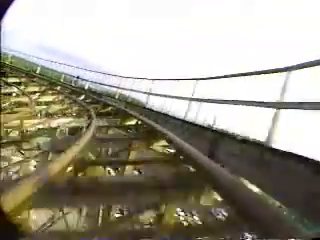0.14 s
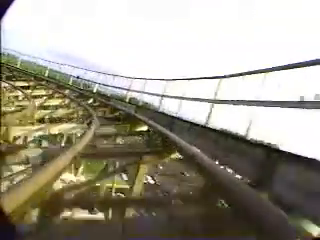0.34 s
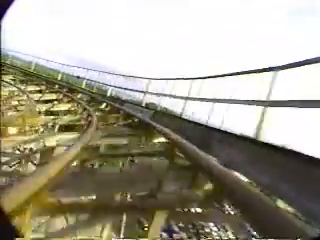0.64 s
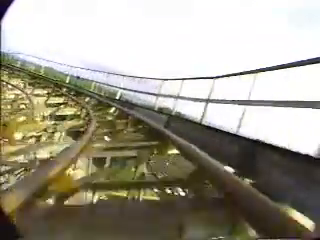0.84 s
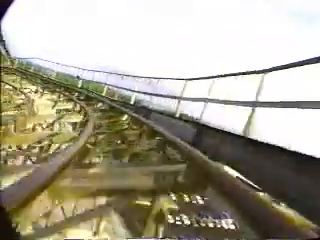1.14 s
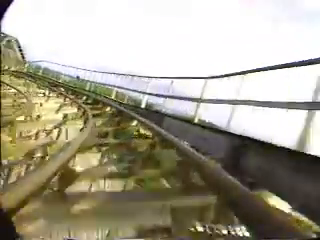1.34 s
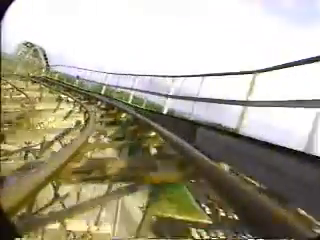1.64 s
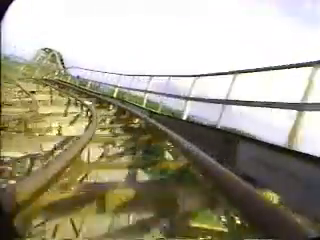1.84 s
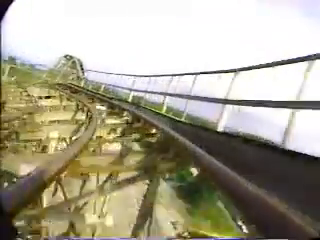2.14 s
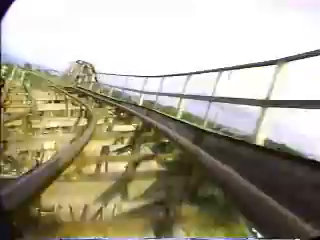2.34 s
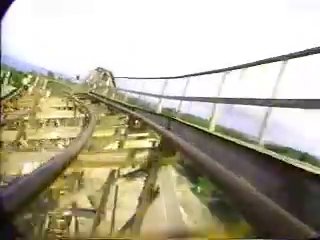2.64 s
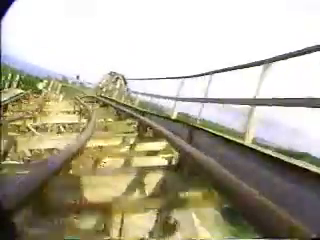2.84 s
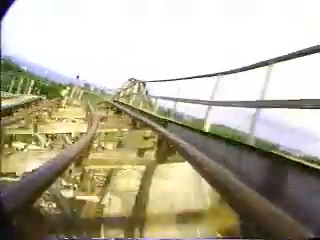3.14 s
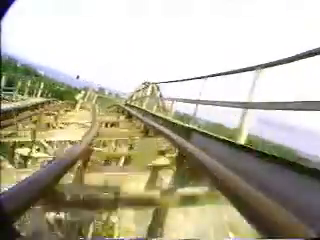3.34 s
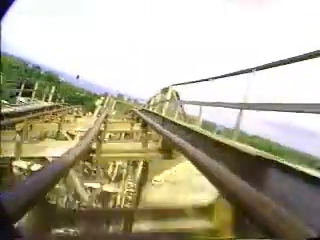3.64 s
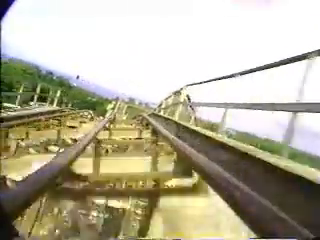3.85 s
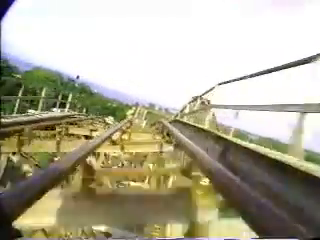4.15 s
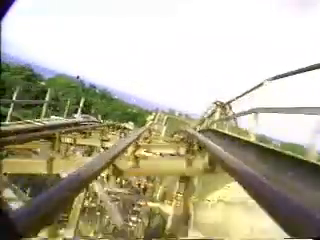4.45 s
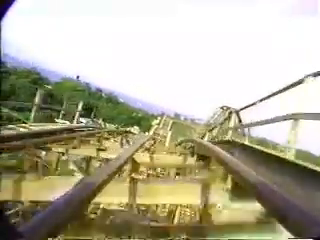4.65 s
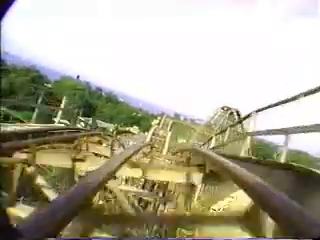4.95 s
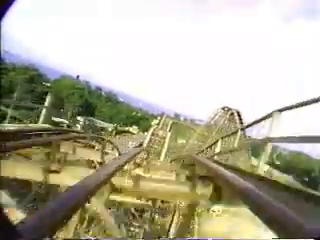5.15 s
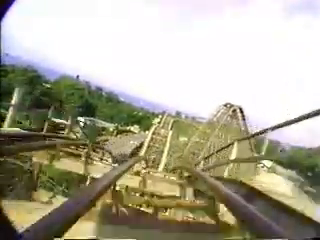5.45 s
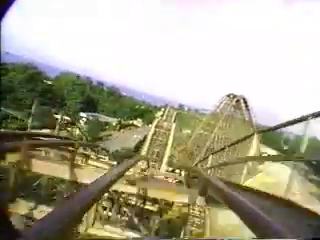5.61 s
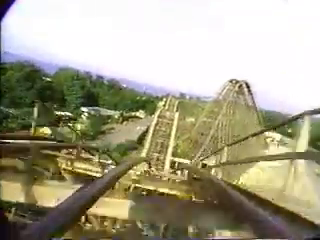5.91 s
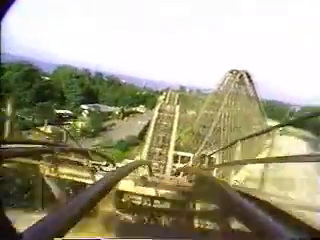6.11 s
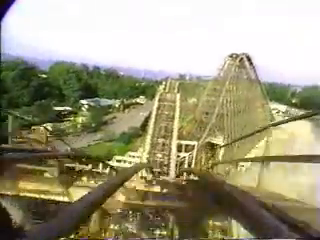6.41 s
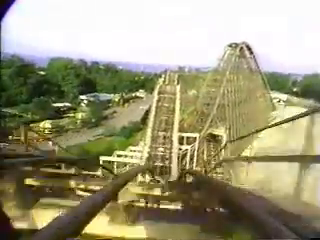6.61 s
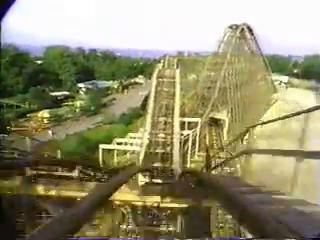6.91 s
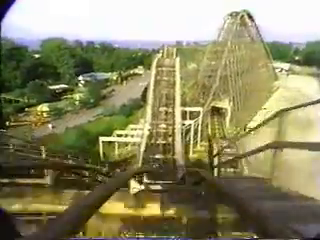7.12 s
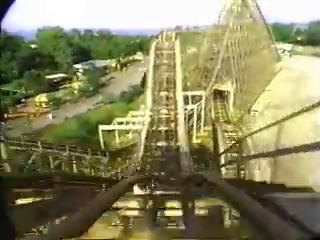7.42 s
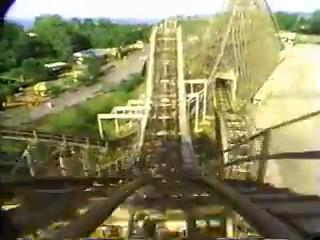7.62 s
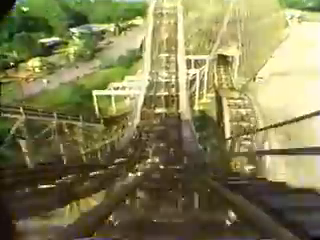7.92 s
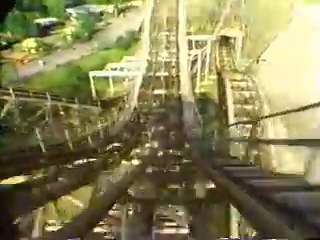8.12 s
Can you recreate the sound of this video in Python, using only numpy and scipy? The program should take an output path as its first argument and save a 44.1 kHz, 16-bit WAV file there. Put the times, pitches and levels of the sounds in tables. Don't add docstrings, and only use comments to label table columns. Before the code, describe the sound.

Heard from the front car of a roller coaster, wheels drone low through the body, swelling and dropping in quick uneven pulses. Early gusts slam the onboard microphone, distorting into bassy thumps that swallow the treble. The wind eases midway, leaving hum, rolling hiss and ringing axle chatter. Near the end the shaking grows and loose parts clank rapidly. Tape hiss stays underneath.

```python
import sys
import numpy as np
from scipy import signal
from scipy.fft import rfft, irfft, next_fast_len
from scipy.io import wavfile
from scipy.ndimage import uniform_filter1d, map_coordinates

SR = 44100
rng = np.random.default_rng(int(sys.argv[2]) if len(sys.argv) > 2 else 0)


def to_linear_factor(level_db):
    exponent = np.asarray(level_db, float) / 20
    return 10 ** exponent


def digitize_waveform(pressure):
    field = np.atleast_2d(pressure).T
    bounded = np.clip(field, -1, 1)
    quanta = np.round(bounded * 32767).astype(np.int16)
    wavfile.write(sys.argv[1], SR, quanta)


N = 364707


def unit(x):
    return x / np.sqrt(np.mean(x ** 2) + 1e-20)


def curves(rows):
    knot_s, *columns = np.transpose(rows)
    return [np.interp(np.arange(N) / SR, knot_s, column) for column in columns]


def bumps(rows, sharpness):
    t = np.arange(N) / SR
    return sum(db * np.exp(-np.abs((t - s) / half_s) ** sharpness) for s, db, half_s in rows)


def wobble(rate_hz):
    knots = rng.standard_normal(int(N * rate_hz / SR) + 4)
    return map_coordinates(knots, [np.arange(N) * rate_hz / SR])


def filtered(x, response):
    m = next_fast_len(N + SR // 2)
    return irfft(rfft(x, m) * response(np.fft.rfftfreq(m, 1 / SR)), m)[:N]


def noise_through(response):
    return unit(filtered(rng.standard_normal(N), response))


def rush(spectrum):
    f, db = np.transpose(spectrum)
    return noise_through(lambda hz: to_linear_factor(np.interp(np.log(hz + 1), np.log(f), db)))


def steadied(x, seconds):
    power = np.abs(uniform_filter1d(x ** 2, int(seconds * SR)))
    return unit(x / np.sqrt(power + 0.027))


def patchy(x, depth_db):
    z = signal.stft(x, nperseg=512)[2]
    field = uniform_filter1d(rng.standard_normal(z.shape), 6, axis=0)
    field = uniform_filter1d(field, 8, axis=1)
    return unit(signal.istft(z * to_linear_factor(depth_db * unit(field)), nperseg=512)[1][:N])


# time in seconds, buffet level in dB.
WIND_LEVEL = [(0.0, -19), (0.6, -21.5), (1.1, -21), (1.8, -22), (1.98, -15), (2.3, -26), (2.75, -23.5),
              (3.2, -22.5), (4.0, -28), (4.35, -27), (4.45, -23), (5.0, -24), (5.7, -24.5), (6.3, -23.5),
              (6.95, -26), (7.25, -22), (7.55, -24.5), (7.85, -21.5)]
# frequency in Hz, density in dB per Hz.
BUFFET_SPECTRUM = [(8, -12.5), (25, -0.5), (35, -0.5), (65, -7.5), (85, -26), (180, -20), (260, -25),
                   (350, -30), (600, -39.5), (1200, -84.5)]
# start in seconds, length in ms, strength as a fraction.
GUST_SHOVES = [(0.016, 6.6, 1.0), (0.067, 4.8, 0.97), (0.13, 6.6, 1.0), (0.153, 24, 1.0), (0.2, 7.5, 0.86),
               (0.258, 13.8, 0.8), (0.587, 10.4, 0.9), (0.627, 5.6, 0.58), (0.747, 8.5, 1.0),
               (0.786, 10.8, 0.82), (0.934, 4.4, 0.76), (1.155, 6.7, 0.49), (1.245, 2.4, 0.89),
               (1.297, 8.5, 0.76), (1.325, 8.7, 0.97), (1.371, 5.3, 1.0), (1.863, 8.9, 0.63),
               (1.894, 9.7, 0.7), (2.001, 4, 0.95), (2.084, 9.4, 0.94), (2.416, 6, .6), (2.752, 4.1, 0.5),
               (4.44, 7.5, .8), (6.307, 11.7, 1.0), (7.353, 6.5, 0.71), (7.882, 4.8, 0.67),
               (8.094, 13, 0.92), (8.234, 4.7, 0.93)]


def wind():
    buffet_db, = curves(WIND_LEVEL)
    x = to_linear_factor(buffet_db + 6.0 + wobble(14)) * steadied(rush(BUFFET_SPECTRUM), .1)
    edges_ms = 5
    for s, ms, strength in GUST_SHOVES:
        total_ms = ms + edges_ms
        shove = signal.windows.tukey(int(total_ms * SR / 1000), edges_ms / total_ms)
        part = x[int((s - .0025) * SR):][:len(shove)]
        side = np.sign(part.mean() + .2)
        part += .7 * strength * side * shove[:len(part)]
    return x


# time in seconds, load in dB, hum pitch in Hz.
WHEEL_DRONE = [(0.0, -18, 108), (0.3, -19, 124), (0.8, -20, 121), (1.1, -22.5, 117), (1.5, -22, 121),
               (2.0, -18.5, 120), (2.3, -21.5, 114), (3.05, -19.5, 132), (3.5, -20.5, 120), (4.0, -20, 124),
               (4.7, -21.5, 118), (5.1, -22, 110), (5.6, -19.5, 120), (6.1, -20, 124), (6.5, -19, 124),
               (6.85, -16, 125), (7.5, -19, 125), (8.27, -16, 131)]
# centre in seconds, rise in dB, half length in seconds.
PRESSES = [(0.0, 5.5, 0.043), (0.25, 2.5, .05), (0.9, 3, 0.055), (1.27, 9, 0.052), (1.5, 4, 0.053),
           (2.06, 6, 0.06), (2.58, 6.5, 0.028), (2.83, 7.5, 0.058), (3.13, 1.5, 0.039), (3.31, 4.5, 0.053),
           (3.64, 5, .04), (3.89, 7, 0.035), (4.08, 3.5, .04), (4.24, 4, 0.042), (4.42, 9, 0.028),
           (4.52, 6, 0.025), (4.7, 4, .03), (4.88, 3.5, 0.075), (5.27, 7.5, 0.044), (5.46, 4, .06),
           (5.64, 2.5, .03), (5.78, 4, 0.044), (5.89, 4.5, 0.033), (6.18, 1, .04), (7.21, 3.5, 0.024),
           (7.42, 3, 0.02), (7.53, 1.5, 0.02), (7.945, 6, 0.087), (8.08, 3.5, 0.024), (8.2, 4, 0.032)]
# centre in seconds, change in dB.
FLOATS = [(0.07, -6), (0.37, -8), (0.8, -8.5), (1.15, -1.5), (1.36, -6.5), (2.16, -6.5), (3.06, -3),
          (3.18, -5.5), (3.45, -4), (3.57, -5.5), (3.84, -6), (3.98, -6), (4.12, -5.5), (4.37, -12),
          (4.47, -4.5), (4.62, -6.5), (4.74, -2.5), (5.04, -6), (5.18, -14), (5.395, -9.5), (5.6, -3),
          (5.69, -7.5), (5.83, -10), (5.94, -14), (6.24, -9), (6.47, -12), (6.93, -6), (7.25, -2.5),
          (8.04, -11), (8.27, -10.5)]
# centre in seconds, extra level in dB.
RAIL_JOINTS = [(0.277, 1.5), (1.241, 3), (0.765, 5.5), (1.37, 6), (1.544, 3.5), (2.02, 4), (2.1, 4),
               (2.289, 3.5), (2.415, 5.5), (2.571, 5.5), (2.831, 4.5), (3.013, 3.5), (3.117, 5.5),
               (3.398, 3), (3.498, 4), (3.621, 6.5), (3.883, 1.5), (4.433, 1.5), (5.273, 3.5), (5.461, 2.5),
               (6.507, 5.5), (6.867, 2), (6.983, 3), (7.097, 6), (7.214, 6.5), (7.427, 5), (7.646, 6.5),
               (7.776, 3.5), (8.082, 1.5), (8.196, 3)]


def drone():
    float_half_s, joint_half_s = .025, 0.022
    knock_hz, knock_db = 750, -26.5
    load_db, hz = curves(WHEEL_DRONE)
    floats_db = bumps([(s, db, float_half_s) for s, db in FLOATS], 1.7)
    level_db = load_db + bumps(PRESSES, 1.87) + floats_db

    wandering_hz = hz + 13 * wobble(30) + 6 * wobble(6)
    hum = np.sqrt(2) * np.sin(2 * np.pi * np.cumsum(wandering_hz) / SR)
    roar = noise_through(lambda f: np.exp(-((f - 126) / 30) ** 4))
    body = steadied(0.59 * hum + 0.74 * roar, 0.036)

    surge = to_linear_factor(1.57 * bumps([(s, db, joint_half_s) for s, db in RAIL_JOINTS], 4))
    lean = 0.78 * (surge - 1)
    knock = noise_through(lambda f: np.exp(-np.log((f + 1) / knock_hz) ** 2 / 0.47))
    knock = to_linear_factor(knock_db) * (surge - 1) * knock
    return to_linear_factor(level_db + 0.71) * (surge * body + lean + knock)


# frequency in Hz, density in dB per Hz.
ROLLING_SPECTRUM = [(200, -6), (500, 6.5), (900, 2), (1400, 1.5), (2500, -1), (3000, -6), (3500, -8.5),
                    (4200, -5.5), (5500, -18.5), (7200, -19), (9000, -39)]


def rolling_hiss(hiss_db, chatter_db, shake):
    flutter_db = 0.27 * shake + 1.4 * wobble(90) + .8 * wobble(8)
    level_db = hiss_db + 4 + 0.21 * chatter_db + flutter_db
    return to_linear_factor(level_db) * patchy(rush(ROLLING_SPECTRUM), depth_db=2.0)


# frequency in Hz, width in Hz, level in dB.
AXLE_MODES = [(1447, 140, -2.5), (3440, 220, -4), (4897, 210, 0), (7430, 560, -15.5)]


def axle_ring(hiss_db, chatter_db, shake):
    def modes(f):
        total = 0
        for k, (centre_hz, width_hz, db) in enumerate(AXLE_MODES):
            damping = 1j * f * width_hz
            total = total + (-1) ** k * to_linear_factor(db) * damping / (centre_hz ** 2 - f * f + damping)
        return total

    mean_db, growth, choke = -53.5, 1.8, 0.44
    ring_db = mean_db + growth * (hiss_db - hiss_db.mean()) + chatter_db - choke * bumps(PRESSES, 1.8)
    flutter_db = 1.7 * shake + 1.2 * wobble(12)
    return to_linear_factor(ring_db + 4 + flutter_db) * noise_through(modes)


# start in seconds, peak in dB, pitch in Hz.
LOOSE_CLANKS = [(0.0608, -28.5, 4880), (0.1136, -29, 4180), (0.6552, -28, 3530), (1.3359, -29, 4880),
                (1.8555, -30, 2730), (2.0672, -25, 4650), (2.3316, -23.5, 4850), (2.6912, -24, 2824),
                (3.497, -21.5, 4800), (3.7349, -24, 3680), (3.9093, -29, 4750), (3.9639, -24.5, 4890),
                (4.1046, -25.5, 4980), (5.759, -26, 5070), (6.102, -21.5, 3360), (6.247, -24, 4740),
                (6.3215, -27, 3970), (6.3684, -26, 4910), (6.52, -26.5, 4700), (6.688, -22.5, 4750),
                (6.8808, -21.5, 2500), (7.1477, -22.5, 5030), (7.904, -18, 4880), (7.9325, -20, 4790),
                (7.9873, -22, 3460), (8.0321, -26, 4850), (8.1117, -22, 4800), (8.1772, -19, 4860),
                (8.216, -22, 3200), (8.2482, -14, 4960)]


def clanks():
    out = np.zeros(N + SR)
    t = np.arange(SR // 16) / SR
    for s, db, hz in LOOSE_CLANKS:
        noise = rng.standard_normal(len(t))
        tone = np.sin(2 * np.pi * hz * t + 6 * np.cumsum(noise) / 100) + 0.54 * noise
        attack = 1 - np.exp(-t / 0.003)
        out[int(s * SR):][:len(t)] += to_linear_factor(db - 6.0 - 60 * t / .09) * attack * tone
    return out[:N]


# time in seconds, shaking level in dB.
GEAR_SHAKING = [(0.0, -47.5), (0.11, -41.5), (0.5, -45.5), (0.68, -42), (0.9, -45), (1.35, -41),
                (1.55, -44), (1.95, -45), (2.1, -44), (2.6, -44.5), (3.3, -43), (4.0, -41), (4.55, -44.5),
                (5.5, -42), (5.75, -45.5), (6.45, -38.5), (7.1, -42), (8.27, -35.5)]
# centre in seconds, rise in dB, half length in seconds.
AXLE_CHATTER = [(0.66, 2, 0.067), (0.87, 10.5, 0.021), (1.06, 4, .07), (1.36, 10, 0.013), (1.43, 5, 0.019),
                (1.85, 11.5, 0.11), (2.23, 12, 0.025), (2.38, 11, 0.04), (2.51, 9, .03), (2.72, 7, 0.16),
                (3.06, 10.5, 0.013), (3.3, 9, .05), (3.5, 5.5, 0.098), (3.72, 5, 0.096), (3.97, 7, 0.041),
                (4.11, 5, .06), (4.36, 12, 0.13), (4.74, 11.5, 0.037), (4.92, 9, 0.12), (5.2, 3.5, 0.2),
                (5.53, 8.5, 0.084), (5.86, 13, 0.17), (6.18, 8.5, 0.086), (6.38, 4.5, 0.018),
                (6.62, 7, 0.088), (6.93, 12, 0.052), (7.16, 12, 0.023), (7.27, 10.5, .05),
                (7.62, 6.5, 0.13), (8.04, 4.5, 0.016)]


def gear():
    hiss_db, = curves(GEAR_SHAKING)
    chatter_db = bumps(AXLE_CHATTER, 2.2)
    shake = wobble(30)
    hiss = rolling_hiss(hiss_db, chatter_db, shake)
    return hiss + axle_ring(hiss_db, chatter_db, shake) + clanks()


def scene():
    return (wind() + drone() + gear())[None]


PREAMP_RAILS = (.18, .36)


def preamp(x):
    rail = np.where(x > 0, *PREAMP_RAILS)
    return x / (1 + np.abs(x / rail) ** 30) ** (1 / 30)


def bass_cut(f, coupling_hz, ring_hz, damping):
    s = 1j * f
    capacitors = s / (s + coupling_hz[0]) * s / (s + coupling_hz[1])
    return capacitors * s * s / (s * s + damping * s * ring_hz + ring_hz ** 2)


# frequency in Hz, density in dB per Hz.
HISS_SPECTRUM = [(300, -1), (1500, 2.5), (4000, -3.5), (7300, -8), (9000, 2.5)]
# frequency in Hz, level in dB rms.
CAMERA_WHINE = [(5755, -71.5), (7192, -71.5), (7913, -71)]


def camera_noise():
    x = to_linear_factor(-43.0) * rush(HISS_SPECTRUM)
    for hz, db in CAMERA_WHINE:
        x = x + to_linear_factor(db + 4.5) * np.sin(2 * np.pi * hz * np.arange(N) / SR)
    return x


def top_cut(x):
    return signal.sosfilt(signal.butter(12, 8820, fs=SR, output="sos"), x)


def record(dry):
    x = preamp(dry[0])
    x = filtered(x, lambda f: bass_cut(f, coupling_hz=(50, 8), ring_hz=67.5, damping=0.63))
    x = x + camera_noise()
    x = filtered(x, lambda f: np.exp(-(f / 8000) ** 18))
    return top_cut(x[None])


dry = scene()
out = record(dry)
digitize_waveform(out)
```